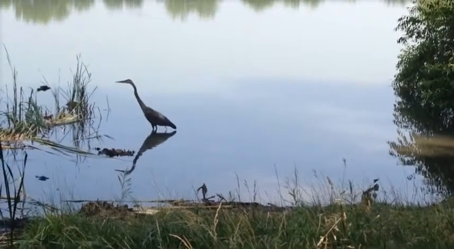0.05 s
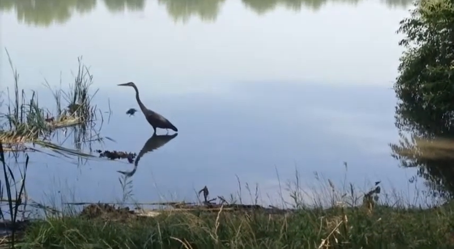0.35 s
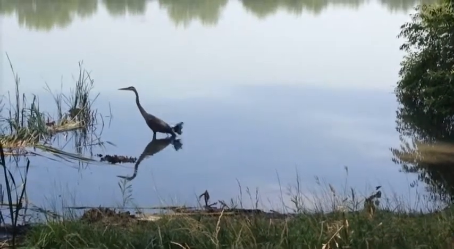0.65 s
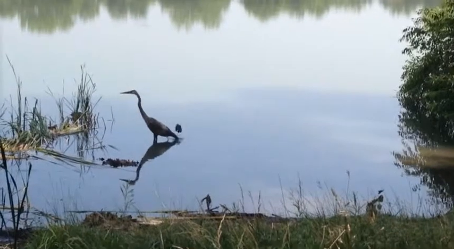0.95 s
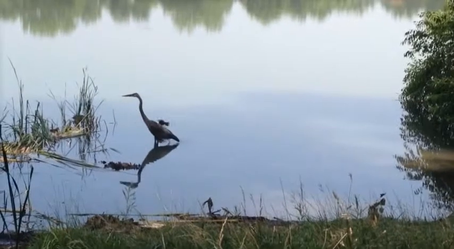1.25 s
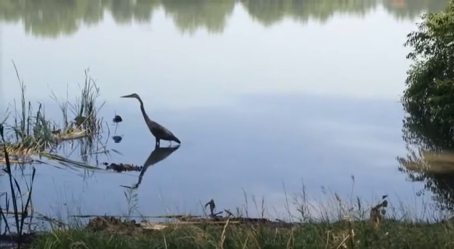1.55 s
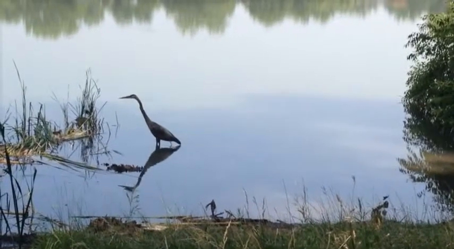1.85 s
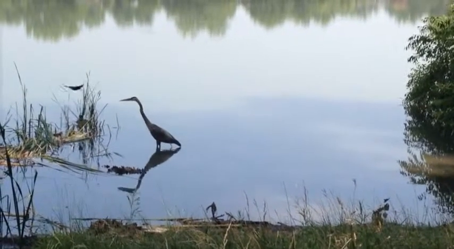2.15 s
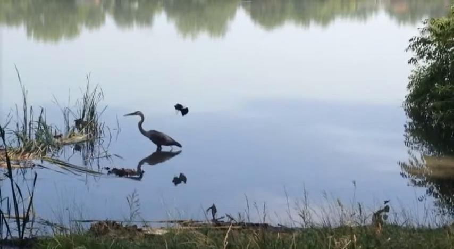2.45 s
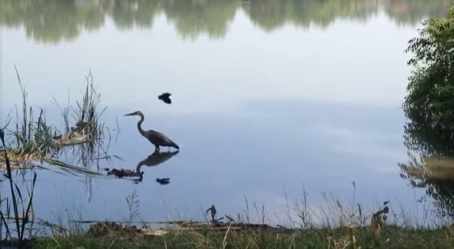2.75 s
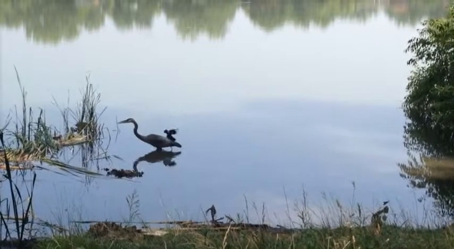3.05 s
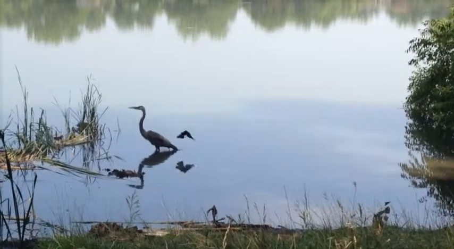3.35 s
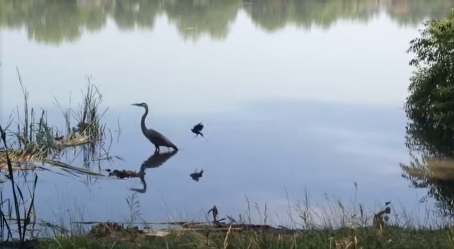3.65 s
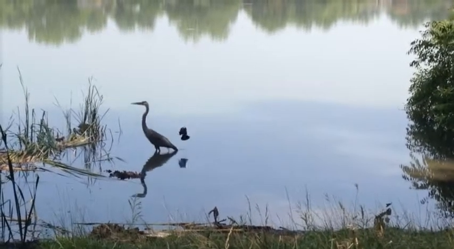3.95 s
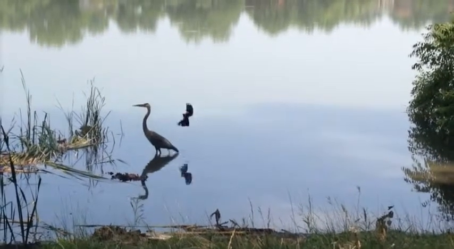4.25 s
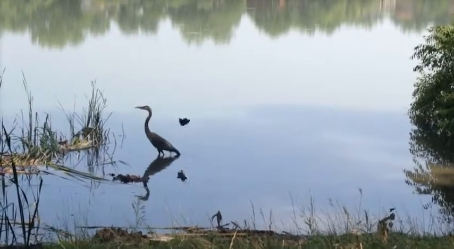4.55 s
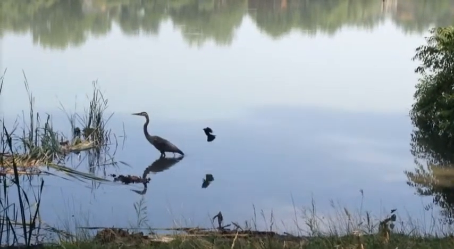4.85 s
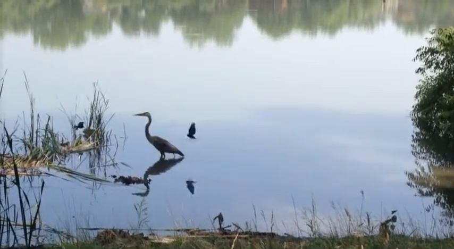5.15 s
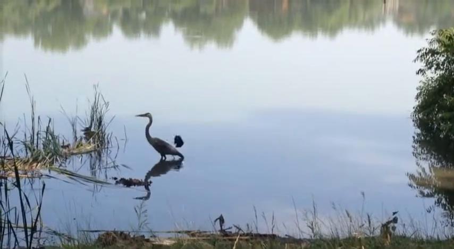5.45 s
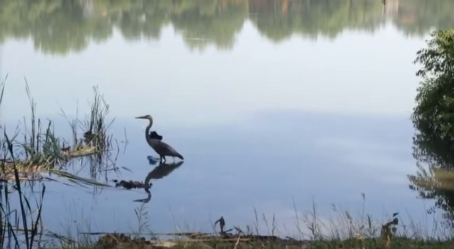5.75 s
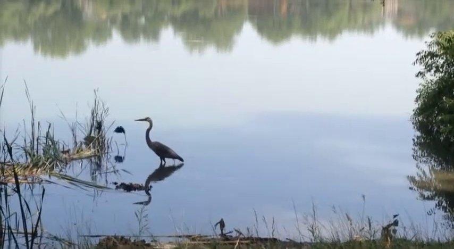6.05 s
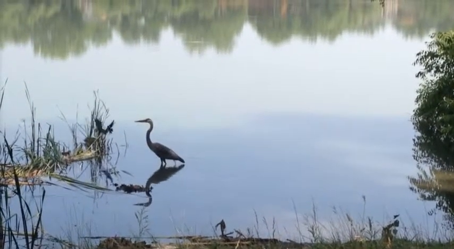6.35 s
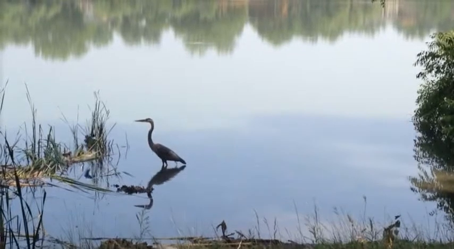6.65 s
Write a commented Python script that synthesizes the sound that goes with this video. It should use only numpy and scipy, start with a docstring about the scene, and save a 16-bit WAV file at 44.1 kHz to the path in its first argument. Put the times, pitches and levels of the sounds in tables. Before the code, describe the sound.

From the first moment to the end, about seven seconds, blackbirds give sharp, raspy chek calls at the edge of a pond. Each call is very short, almost a click, with a brief echo off wooded banks. They come unevenly, around seven a second, often in close pairs, with stronger ones near 0.9, 2.3, 2.7, 3.5 and 4.3 seconds. A quick, harsh falling chirp sounds right at the start, and faint, thin, high whistles from other small birds follow at about 0.2, 2.6 and 3.2 seconds. Far off, an engine drones with a slight throb. Its pitch falls during the first second, stays fairly level until 5.5 seconds, then falls again as it fades. A low rumble of distant traffic and a soft, steady outdoor hush lie beneath everything. The whole scene is quiet and open, heard from the near bank.

```python
"""Sharp, raspy "chek" calls ring out as blackbirds mob a heron at the edge of a pond. Each is a pulse
train from the syrinx, filtered by throat and bill and answered by reverberation from the wooded banks.
Other small birds chirp and whistle faintly. Far off an engine's exhaust drone falls in pitch as it slows,
runs on and falls again, over the rumble of traffic and a steady outdoor hush."""
import sys
import numpy as np
from scipy import signal
from scipy.fft import rfft, irfft, next_fast_len
from scipy.io import wavfile
from scipy.ndimage import uniform_filter1d, map_coordinates

SR = 44100
rng = np.random.default_rng(int(sys.argv[2]) if len(sys.argv) > 2 else 0)


def to_wav(sig):
    """Store sig (one row per channel, or 1-D mono) as 16-bit WAV at the path in sys.argv[1].

    Samples outside -1..1 are clipped; the rate is SR.
    """
    pcm = np.clip(np.atleast_2d(sig), -1, 1) * 32767
    pcm = np.round(pcm).astype(np.int16)
    wavfile.write(sys.argv[1], SR, pcm.T)  # frames by channels


N = 300762
TOP_HZ = 15750  # upper band limit

# Each row: midpoint in seconds, level in dB, peak pitch in Hz, rasp from 0 to 1, length in seconds,
# bill resonance in Hz, its height in dB, its width in Hz, then bass, treble, top and echo trims in dB.
ALARM_CALLS = [(-.06, -53, 702, .4, 0.022, 3940, 6, 600, 0, -5, -2, -1),
               (0.3, -55.5, 672, .35, 0.027, 3600, 5, 900, -3, -9, -9, -11),
               (0.317, -53.5, 636, 0, 0.022, 4800, 9, 450, 0, -1, -1, -2),
               (.35, -55, 815, 0.6, 0.034, 2960, 12, 500, 0, 0.5, -2, -1),
               (0.509, -51.5, 686, 0.5, 0.034, 4880, 9, 350, -2, -3, -3, 1),
               (0.607, -48.5, 861, 0.6, 0.025, 4200, 7.5, 680, 1.5, 3, 1, -0.5),
               (.873, -46, 816, 0.6, 0.033, 4340, 3.5, 870, -1.5, 3.5, 1, -1.5),
               (.928, -52, 568, .5, 0.031, 4200, 6, 830, 0, -2, -2, 0.5),
               (1.129, -52.5, 679, 0.7, 0.032, 4236, 5, 900, 0.5, -2, -5, 0),
               (1.275, -56.5, 847, .2, 0.021, 4000, 13, 690, 1, 2.5, 4, -1.5),
               (1.402, -51.5, 683, .45, 0.029, 4100, 5.5, 800, -4, -4, -1, -2),
               (1.472, -55, 679, 0.2, 0.028, 5300, 7, 780, 2, -1.5, -3, -0.5),
               (1.566, -53, 748, .6, 0.029, 4157, 4, 600, 2, 1, 2, -3.5),
               (1.746, -54.5, 652, 0.45, 0.03, 4430, 5, 900, 1.5, -0.5, -3, -.5),
               (1.905, -50, 604, .45, .027, 3880, 11, 740, -3, -1.5, 5, -5.5),
               (2.31, -47, 771, 0.54, 0.028, 3920, 15.5, 800, 1.5, 2.5, 3, -2.5),
               (2.456, -50, 709, .26, 0.031, 5030, 7, 580, -1.5, -4.5, -7, -1.5),
               (2.511, -54, 668, .4, 0.033, 4180, 11, 610, 2, 3.5, 4, 6),
               (2.541, -51.5, 736, 0.7, 0.029, 4460, 15, 560, 8, 9, 5, -8),
               (2.729, -45.5, 873, 0.3, 0.033, 4530, 10.5, 860, 4.5, 6.5, 4, -4),
               (2.775, -50, 598, 0.4, .03, 5050, 11.5, 530, -1, -3, -1, -.5),
               (2.932, -52, 683, 0.6, 0.035, 3940, 10, 560, -1.5, 3, 7, 0),
               (2.966, -55.5, 677, .5, .025, 3940, 12, 450.2, 4, 1, -4, -2),
               (3.123, -50.5, 613, 0.4, 0.03, 5370, 7, 650, -4, -6, -9, -1),
               (3.15, -54.5, 797, 0.6, 0.035, 4877, 5, 660, 5, 3.5, 3, 2.5),
               (3.338, -51.5, 743, .3, 0.028, 3740, 14, 350, 0, 1.5, -1, 0),
               (3.512, -45, 764, .27, 0.035, 4680, 10.5, 710, 2, 2, 4, 1.5),
               (3.711, -51, 900, 0.4, 0.03, 4463, 8.5, 450, -8, 5, 8, -3.5),
               (3.761, -54, 698, .45, 0.039, 4110, 9, 900, -3, -3, -6, .5),
               (3.921, -55, 641, 0.4, .025, 4530, 3, 300, 0, -0.5, 0, -1),
               (4.053, -49.5, 684, .7, 0.03, 5100, 3, 570, -5, -5, -5, -1.5),
               (4.083, -57, 698, .7, 0.032, 5010, 7, 350, -5, -1, -1, 0.5),
               (4.343, -46.5, 818, 0.45, 0.038, 4800, 6, 670, -3, -2, 0, 1.5),
               (4.719, -51, 689, 0.33, .033, 4770, 5, 300, -3.5, -4.5, -6, 2),
               (4.779, -56, 808, 0.39, 0.027, 4310, 5, 660, -1.5, -.5, 3, -1),
               (5.052, -54.5, 620, 0.61, 0.024, 5084, 7, 610, 0.5, -3, -5, 0),
               (5.099, -52.5, 771, 0.5, .029, 3670, 9, 430, -8, -4, -4, -1),
               (5.514, -49.5, 770, 0.3, 0.029, 4030, 9, 650, -3.5, -0.5, 3, -1.5),
               (5.585, -53, 696, .15, .027, 4640, 9.5, 900, 1.5, -1, -2, -1),
               (5.795, -53.5, 635, .6, 0.024, 4200, 4.5, 900, -2, -1, 1, 0),
               (5.899, -49.5, 677, 0.4, 0.035, 5100, 5, 740, -2, -3, -3, -0.5),
               (5.932, -53, 874, 0.4, .027, 3900, 2, 700, -7, -1.5, -1, -4),
               (6.134, -53, 665, 0.1, .027, 3440, 5, 440, -5, -3, -2, -.5),
               (6.274, -49.5, 717, 0.3, 0.026, 3520, 21, 720, 0, 10, 8, -3.5),
               (6.331, -50, 599, 0.5, 0.03, 5110, 8.5, 600, -2.5, -2.5, -1, -2),
               (6.435, -59.5, 709, .4, 0.034, 3500, 4, 650, -6, -5, -6, -2.5),
               (6.602, -48.5, 707, .2, 0.027, 3530, 17, 700, -1, 6, 9, -4),
               (6.688, -51.5, 691, .1, .029, 4000, 8, 900, 1, -0.5, -1, 1.5)]


def blackbirds(usual_db=-53, echo_rasp=0.63, echo_width_hz=1000):
    """Source and filter: each call is a voice shaped by the bill, heard directly and by reflection."""
    out = np.zeros(N)
    for s, db, pitch_hz, rasp, length, *timbre, echo_db in ALARM_CALLS:
        bill_hz, ring_db, width_hz, *shelves_db = timbre
        call = opening_bill(syrinx(pitch_hz, rasp, length), *timbre)
        direct = unit(water_and_reeds(call))
        # The trees hear other, rougher sides of the call; off axis its resonance is low and broad.
        blurred = syrinx(pitch_hz, echo_rasp, length)
        off_axis_db = 0.73 * ring_db * width_hz / echo_width_hz
        echo = wooded_banks(throat_and_bill(blurred, bill_hz, off_axis_db, echo_width_hz, *shelves_db))
        # Directivity: a call aimed away is fainter, and more of it comes back from the trees.
        aim_db = 0.57 * (usual_db - db)
        start = s - len(direct) / SR / 2
        add(out, start, amp(db) * direct)
        add(out, start, amp(db + echo_db + aim_db) * echo)
    return out


def syrinx(peak_hz, rasp, length, arch_s=0.0175, rise=0.45, jitter=0.014):
    """Periodic pulses form a harmonic series; the pitch arches and the voice roughens on both flanks."""
    t = np.arange(-(SR // 25), SR // 25) / SR
    pitch = peak_hz / (1 + (t / arch_s) ** 2)
    rough = np.clip(rasp * (0.35 + (t / 0.018) ** 2), 0, 0.8)
    phase = 2 * np.pi * np.cumsum(pitch * (1 + jitter * rough * wobble(867, size=len(t)))) / SR
    harmonic = np.arange(1, 40)[:, None]
    # The windpipe weights and delays each partial differently, so the pulses run together.
    weight = amp(3 * rng.standard_normal(harmonic.shape))
    shift = rng.standard_normal(harmonic.shape)
    partials = weight * np.cos(harmonic * phase + shift) * (harmonic * pitch < TOP_HZ)
    pulses = unit(partials.sum(axis=0))
    rasping = unit(rng.standard_normal(len(t)) * (1 + 0.5 * np.cos(phase)))
    flank_s = length * np.where(t < 0, rise, 1 - rise)
    envelope = np.exp(-np.abs(t / flank_s) ** 2.5)
    return envelope * (np.sqrt(1 - rough) * pulses + np.sqrt(rough) * rasping)


def opening_bill(voice, bill_hz, ring_db, width_hz, bass_db, treble_db, top_db):
    """A variable resonator: the bill gapes widest in mid-call, raising its resonance and its treble."""
    drop_hz, muffle_db, span_s = 250, 5.5, 0.015
    half_open = throat_and_bill(voice, bill_hz - drop_hz, ring_db, width_hz,
                                bass_db, treble_db - muffle_db, top_db - muffle_db)
    wide_open = throat_and_bill(voice, bill_hz, ring_db, width_hz, bass_db, treble_db, top_db)
    t = (np.arange(len(voice)) - len(voice) / 2) / SR
    gape = np.exp(-(t / span_s) ** 4)
    return (1 - gape) * half_open + gape * wide_open


# Each row: frequency in Hz, relative gain of the throat in dB.
THROAT_RESPONSE = [(600, -12.5), (1200, -3), (1900, -3), (2300, -4), (2800, 2.5), (3600, 3.5), (4500, 3.5),
                   (5200, -5), (6500, -12), (8200, -12.5), (10500, -21.5), (13500, -17), (15500, -24)]


def throat_and_bill(voice, bill_hz, ring_db, width_hz, bass_db, treble_db, top_db):
    """Formant filtering: the bill adds one resonance and three shelves to the throat's response."""
    shelves = [(2400, bass_db), (3400, 0), (4600, 0),
               (6500, treble_db), (9000, treble_db), (13000, top_db)]

    def response(hz):
        formant_db = ring_db * np.exp(-((hz - bill_hz) / width_hz) ** 2 / 2)
        return amp(along(THROAT_RESPONSE, hz) + formant_db + along(shelves, hz))
    return unit(filtered(voice, response))


def water_and_reeds(call, mirror_gain=0.25, reed_decay_s=0.0084, reed_db=-6):
    """Early reflections: treble mirrored by the water interferes with the call, and reeds scatter it."""
    lag_s = rng.uniform(0.0002, 0.0006)  # set by the bird's height

    def comb(hz):
        treble = hz ** 4 / (hz ** 4 + 6000 ** 4)
        return 1 + mirror_gain * treble * np.exp(-2j * np.pi * hz * lag_s)
    combed = filtered(call, comb)
    t = np.arange(SR // 40) / SR
    spray = rng.standard_normal(len(t)) * np.exp(-t / reed_decay_s)
    scattered = signal.fftconvolve(combed, spray / np.linalg.norm(spray))[:len(call)]
    return combed + amp(reed_db) * scattered


# Each row: frequency in Hz, time for the echo to decay by 60 dB in seconds.
REVERB_TIMES = [(1000, 0.58), (2500, 0.54), (4200, 0.59), (7000, 0.45), (14000, 0.38)]
# Each row: frequency in Hz, relative level of the echo in dB.
ECHO_SPECTRUM = [(1000, -4.5), (2400, -6.5), (3100, -2.5), (3800, -0.5), (4400, 0), (5100, -1.5),
                 (6500, 1.5), (10500, 3.5), (14000, 1.5)]


def wooded_banks(sound, build_s=0.011, near_db=5, near_s=0.023, clump_db=1.5):
    """Diffuse reverberation: near bushes answer first and strongest, while the far banks linger."""
    hz, t, spectra = signal.stft(rng.standard_normal(SR // 2), SR, nperseg=256)
    decay_db = -60 * t / along(REVERB_TIMES, hz)[:, None]
    bushes_db = near_db * np.exp(-(t / near_s) ** 2)
    single_trees_db = clump_db * unit(uniform_filter1d(rng.standard_normal(len(t)), size=6))
    gain = amp(along(ECHO_SPECTRUM, hz)[:, None] + decay_db + bushes_db + single_trees_db)
    onset = 1 - np.exp(-(t / build_s) ** 2)
    _, tail = signal.istft(spectra * gain * onset, SR, nperseg=256)
    return signal.fftconvolve(sound, tail / np.linalg.norm(tail))


# Each row: start in seconds, length in seconds, first and last pitch in Hz, level in dB, rasp from 0 to 1.
FALLING_NOTES = [(0.061, 0.023, 3065, 2030, -46.5, 0.96), (0.136, 0.037, 6100, 5830, -68, 0.1),
                 (0.172, 0.099, 5830, 5700, -74, 0.3), (2.556, 0.38, 7900, 7230, -67, 0.9),
                 (2.57, 0.11, 6660, 6200, -67, .7), (3.212, 0.11, 7870, 5820, -64, 1)]


def small_birds(echo_db=-1):
    """Random modulation spreads each thin, falling whistle from along the shore into a band of noise."""
    out = np.zeros(N)
    for s, length, start_hz, end_hz, db, rasp in FALLING_NOTES:
        progress = np.linspace(0, 1, int(length * SR))
        phase = 2 * np.pi * np.cumsum(start_hz + (end_hz - start_hz) * progress) / SR
        flutter = wobble(start_hz / 4, size=len(phase)) * np.sin(phase)
        flutter += wobble(start_hz / 4, size=len(phase)) * np.cos(phase)
        envelope = np.sin(np.pi * progress)
        note = envelope * (np.sqrt(1 - rasp) * np.sin(phase) + np.sqrt(rasp / 2) * flutter)
        add(out, s, amp(db) * note)
        add(out, s, amp(db + echo_db) * wooded_banks(note))
    return out


# Each row: time in seconds, firing rate in Hz.
FIRING_RATE = [(0, 240.2), (.25, 230.5), (.45, 202), (.65, 159.6), (.9, 140.8), (2.9, 157.2), (3.7, 157.1),
               (4.8, 159.8), (5.5, 158), (5.85, 138.5), (6.2, 113.9), (6.82, 105)]
# Each row: time in seconds, then the levels of drone, octave and roar at the pond in dB.
EXHAUST_LEVELS = [(0, -65, -80, -71), (.25, -60, -81, -64), (.5, -66, -74, -69.5), (.7, -56, -78, -75),
                  (.95, -53.5, -71, -81), (1.25, -59.5, -69, -60.5), (1.55, -56, -62, -74),
                  (1.75, -73, -64, -67), (2, -59, -62, -67), (2.1, -57.5, -75, -74),
                  (2.5, -51.5, -62, -65.5), (3.2, -58.5, -77, -72), (3.47, -52.5, -78, -87),
                  (3.7, -56, -82, -74.5), (5.5, -56, -71.5, -80), (5.85, -60.5, -73.5, -82),
                  (6.15, -69, -69, -88), (6.35, -64, -85, -83), (6.82, -78, -79, -87)]


def engine(throb_hz=6.5, throb_depth=0.27):
    """The firing rate sets the exhaust's fundamental, under a soft roar; the long path makes it flutter."""
    firing_hz, = curves(FIRING_RATE)
    drone_db, octave_db, roar_db = curves(EXHAUST_LEVELS)
    phase = 2 * np.pi * np.cumsum(firing_hz * (1 + 0.0043 * wobble(24.9))) / SR
    throb = 1 + throb_depth * np.sin(2 * np.pi * np.cumsum(throb_hz + wobble(1.98)) / SR)
    drone = amp(drone_db + 1.1 * wobble(14)) * throb * np.sin(phase)
    octave = amp(octave_db + 1.2 * wobble(13)) * np.sin(2 * phase + 0.5 * wobble(40))
    roar = amp(roar_db) * noise([(220, -28), (330, 1.5), (400, -1.5), (520, -7.5), (800, -51)])
    return np.sqrt(2) * (drone + octave) + roar


# Each row: frequency in Hz, relative spectral density in dB.
TRAFFIC_SPECTRUM = [(25, -30), (45, -30), (65, -18), (85, -6), (108, 0.5), (150, 3.5), (190, 1.5),
                    (240, 3.5), (290, -6), (400, -5.5), (600, -13.5), (1000, -46)]


def traffic(start_db=-57.5, fade_db_per_s=0.36):
    """Attenuation with distance: the low rumble of far traffic fades as it recedes."""
    t = np.arange(N) / SR
    return amp(start_db - fade_db_per_s * t + 0.8 * wobble(5)) * noise(TRAFFIC_SPECTRUM)


# Each row: frequency in Hz, relative spectral density in dB.
AIR_SPECTRUM = [(200, -29), (500, 1), (750, 2), (1150, 0.5), (1600, -4), (2100, -6.5), (2600, -8.5),
                (4500, -11), (5200, -19.5), (8000, -20), (10500, -26), (13500, -22), (15700, -24)]


def open_air(hush_db=-62, whine_db=-84, whine_hz=1740):
    """The ambient noise floor: a broadband hush with one faint, wavering tone in it."""
    hush = amp(hush_db + 0.26 * wobble(2.1)) * noise(AIR_SPECTRUM)
    whine_gain = amp(whine_db + 2.6 * wobble(3))
    phase = 2 * np.pi * np.cumsum(whine_hz + 3 * wobble(12)) / SR
    return hush + whine_gain * np.sin(phase)


def amp(db):
    """Decibels to amplitude ratio."""
    return 10 ** (np.asarray(db) / 20)


def unit(x):
    """Normalisation to rms 1."""
    return x / np.sqrt(np.mean(x ** 2) + 1e-20)


def along(points, hz):
    """Interpolation of (Hz, value) points on a logarithmic frequency axis."""
    knots_hz, values = np.transpose(points)
    return np.interp(np.log(hz + 1), np.log(knots_hz + 1), values)


def curves(rows):
    """Linear interpolation in time: one value per sample for each column after the first."""
    times, *columns = np.transpose(rows)
    return [np.interp(np.arange(N) / SR, times, column) for column in columns]


def wobble(rate, size=N):
    """A smooth random curve with `rate` knots a second."""
    knots = rng.standard_normal(int(size * rate / SR) + 4)
    return map_coordinates(knots, [np.arange(size) * rate / SR])


def filtered(x, response):
    """Linear filtering: the spectrum is multiplied by a frequency response."""
    size = next_fast_len(len(x) + 8192)
    return irfft(rfft(x, size) * response(np.fft.rfftfreq(size, 1 / SR)), size)[:len(x)]


def noise(spectrum):
    """Noise of rms 1, coloured by (Hz, dB) points."""
    return unit(filtered(rng.standard_normal(N), lambda hz: amp(along(spectrum, hz))))


def add(track, s, sound):
    """Mix a sound into the track from s seconds on."""
    start = round(s * SR)
    sound = sound[max(-start, 0):]
    part = track[max(start, 0):][:len(sound)]
    part += sound[:len(part)]


def scene():
    """Superposition: all sources sum at the near bank, in one channel."""
    return (blackbirds() + small_birds() + engine() + traffic() + open_air())[None]


def record(dry):
    """An ideal low-pass filter removes everything above the band limit."""
    return np.array([filtered(channel, lambda hz: hz < TOP_HZ) for channel in dry])


dry = scene()
out = record(dry)
to_wav(out)
```